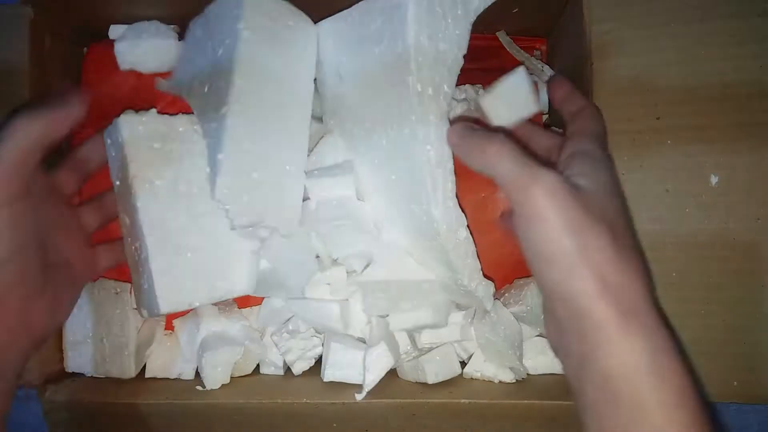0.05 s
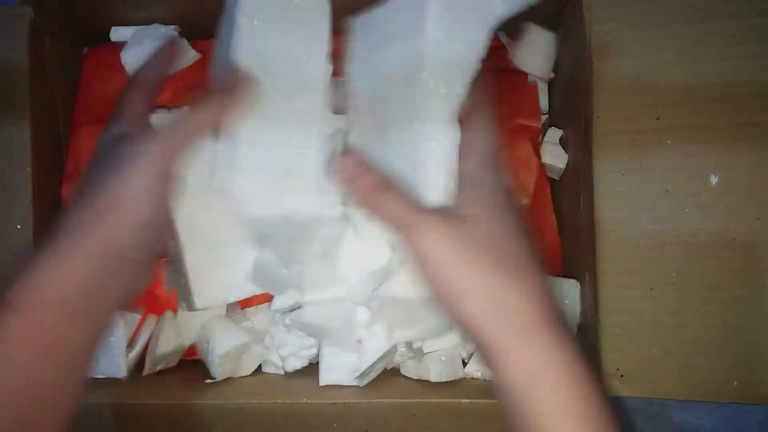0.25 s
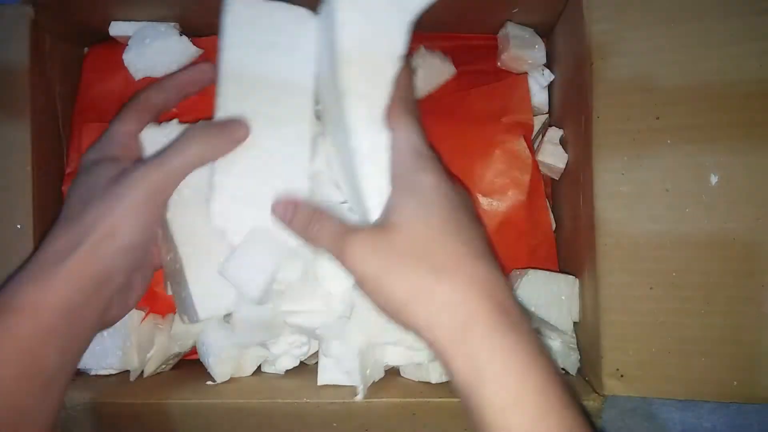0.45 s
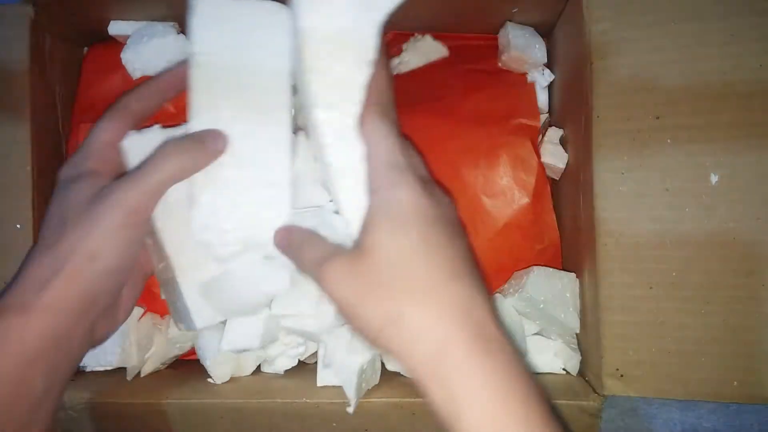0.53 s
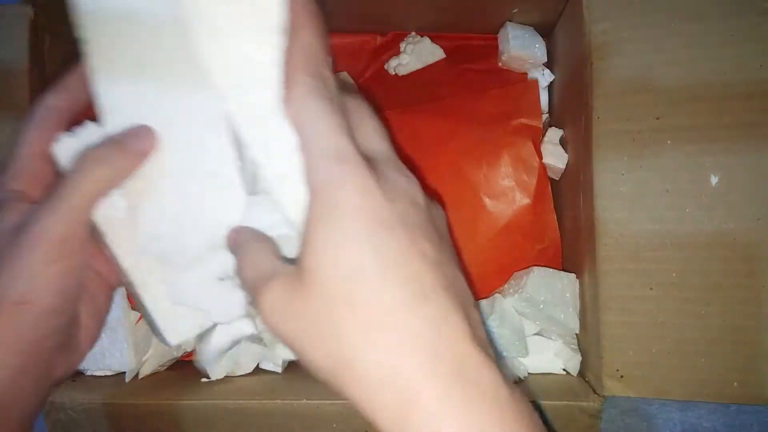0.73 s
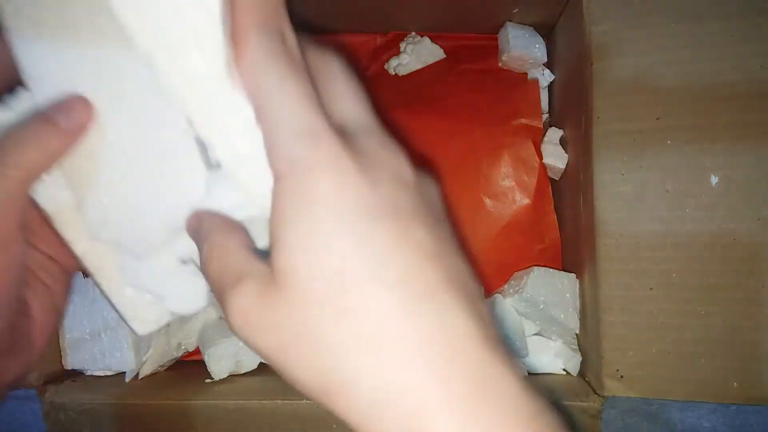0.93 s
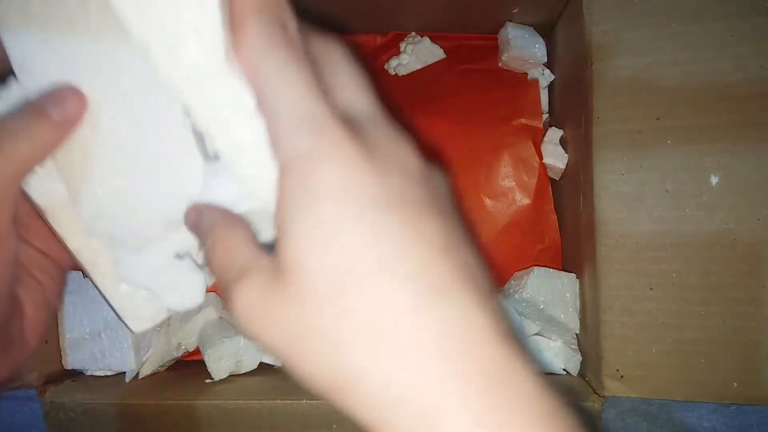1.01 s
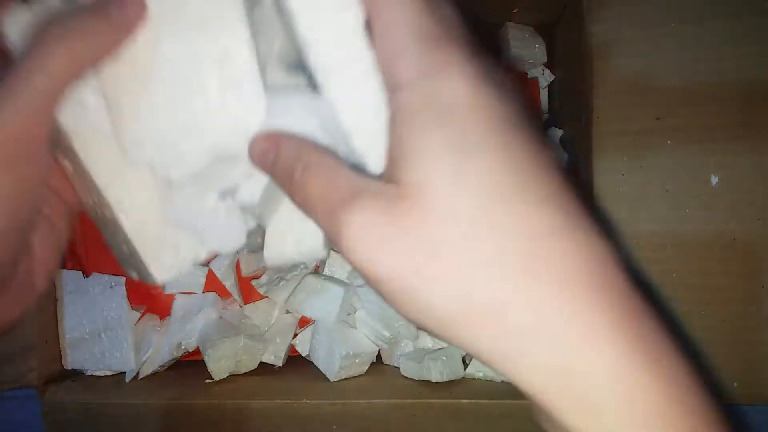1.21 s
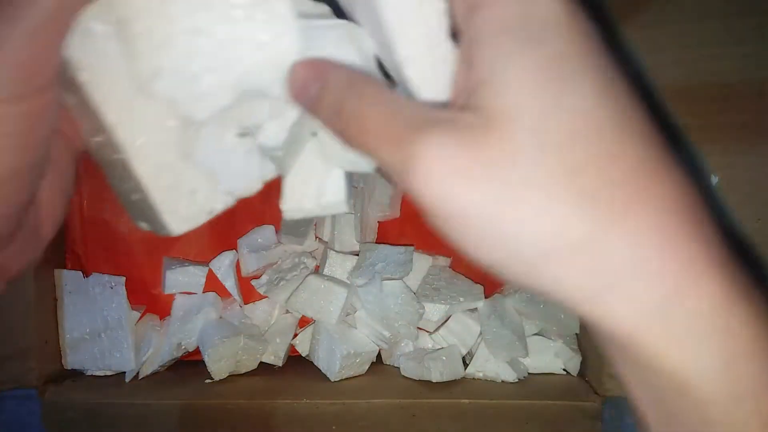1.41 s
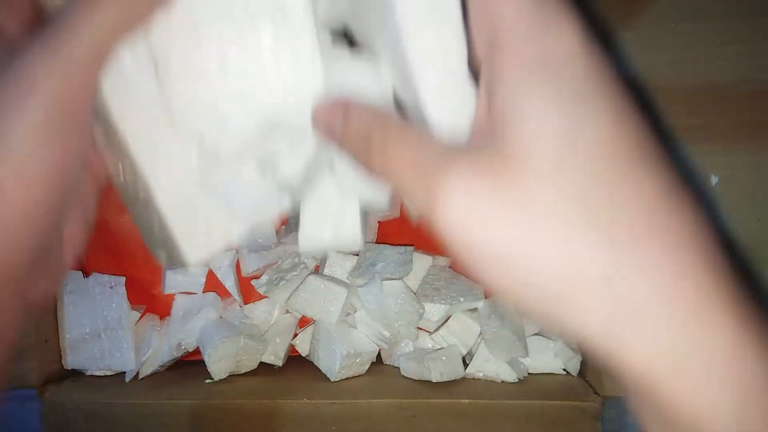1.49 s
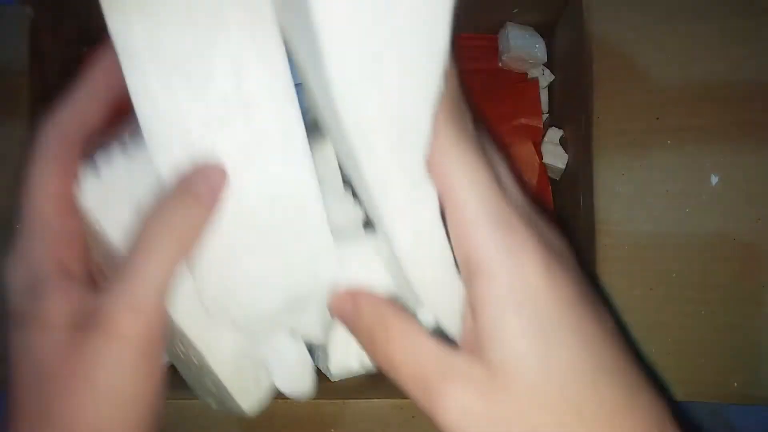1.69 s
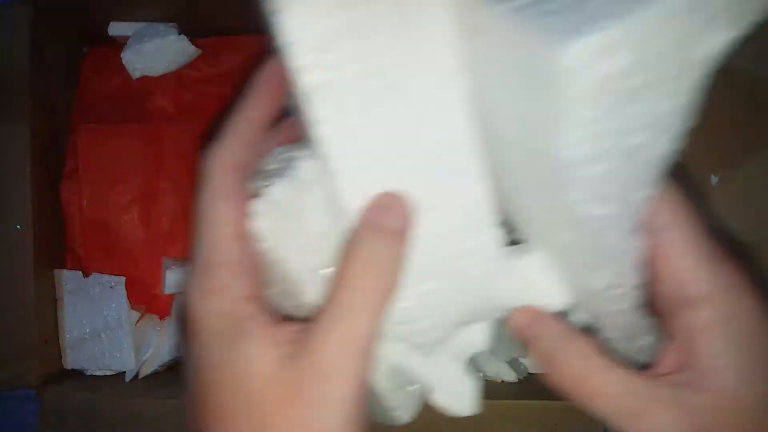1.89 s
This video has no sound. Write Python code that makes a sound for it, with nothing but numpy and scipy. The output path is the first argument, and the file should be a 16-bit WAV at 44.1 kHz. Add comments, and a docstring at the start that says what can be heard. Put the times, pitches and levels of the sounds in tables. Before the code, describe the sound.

Close stereo sound of foam packing handled in a cardboard box: light crackly rubbing and a dull thump, a loud bright squeaking scrape, then near quiet with crisp little snaps, and one final short knock and scuff indoors.

```python
"""Foam packing blocks are lifted by hand out of a cardboard box in a small room, close under a camera's
stereo microphone, above a quiet room hum. Filtered noise and sines make the hum and the box's rumble.
First a light rub, a hollow knock at 0.2 s and the sagging tone of the box wall; from 0.45 to 0.7 s a hard
rub that squeaks. Rubbing is thousands of damped sines, one for each bead slip, over finer hiss.
Then loose pieces tick and knock, each a few ringing modes, and a last short rub comes near 1.8 s."""
import sys
import numpy as np
from scipy import signal
from scipy.fft import rfft, irfft, next_fast_len
from scipy.io import wavfile
from scipy.ndimage import uniform_filter1d, map_coordinates

SR = 44100
rng = np.random.default_rng(int(sys.argv[2]) if len(sys.argv) > 2 else 0)


def to_wav(s):
    """Save 16-bit WAV."""
    ch = np.atleast_2d(s).T  # columns
    pcm = np.round(np.clip(ch, -1, 1) * 32767)  # PCM
    wavfile.write(sys.argv[1], SR, pcm.astype(np.int16))


N = 85995  # samples


def amp(db):
    """dB to gain."""
    return 10 ** (np.asarray(db) / 20)


def unit(x):
    """Scaled to rms 1, over both channels together."""
    return x / np.sqrt(np.mean(x ** 2) + 1e-20)


def along(points, hz):
    """Value at hz between (frequency [Hz], value) points on a log axis."""
    f, v = np.transpose(points)
    return np.interp(np.log(hz + 1), np.log(f + 1), v)


def curves(rows):
    """One value per sample for each column after the time."""
    s, *columns = np.transpose(rows)
    return [np.interp(np.arange(N) / SR, s, column) for column in columns]


def filtered(x, response):
    """x times a response of frequency."""
    m = next_fast_len(N + 8192)
    return irfft(rfft(x, m) * response(np.fft.rfftfreq(m, 1 / SR)), m)[..., :N]


def wobble(rate):
    """A smooth random curve, rate knots a second."""
    knots = rng.standard_normal(int(N * rate / SR) + 4)
    return map_coordinates(knots, [np.arange(N) * rate / SR])


def rings(s, hz, t60, db, size):
    """Sum of damped sines, each starting at its own time between samples and cut after size samples."""
    first = np.floor(s * SR).astype(int) + 1
    t = (first / SR - s)[:, None] + np.arange(size) / SR
    decay = amp(db[:, None] - 60 * t / t60[:, None])
    wave = decay * np.sin(2 * np.pi * hz[:, None] * t)
    at = np.clip(first[:, None] + np.arange(size), 0, N)  # what falls past the end lands in bin N
    return np.bincount(at.ravel(), wave.ravel(), N + 1)[:N]


# Spectrum of the room noise: (frequency [Hz], relative level [dB per Hz])
AIR_COLOUR = [(20, -34.5), (40, -10.5), (150, -13), (216, -29), (284, -18), (371, -19), (449, -9.5),
              (600, -29.5), (1040, -28.5), (1640, -29.5), (4200, -31), (15800, -32)]
# How alike left and right hear it: (frequency [Hz], correlation [1])
AIR_LIKENESS = [(100, 0.94), (500, 0.75), (2000, .5), (8000, .3)]
# Hum tones, before they waver: (frequency [Hz], level [dB rms])
HUM_TONES = [(64.6, -84), (91.5, -88), (274.5, -85)]
AIR_DB = -79.5  # rms of the noise


def air():
    """Room noise, more alike on both sides in the bass, with a few hum tones wavering in level and phase."""
    def turn(hz):
        return np.arccos(np.clip(along(AIR_LIKENESS, hz), -1, 1)) / 2

    def mid_side_response(hz):
        return amp(along(AIR_COLOUR, hz)) * [np.cos(turn(hz)), np.sin(turn(hz))]

    mid, side = filtered(rng.standard_normal((2, N)), mid_side_response)
    noise = unit(np.array([mid + side, mid - side]))
    t = np.arange(N) / SR
    hum = 0
    for hz, db in HUM_TONES:
        level = amp(db + 3 + wobble(4))  # a sine peaks 3 dB above its rms
        hum = hum + level * np.sin(2 * np.pi * hz * t + .4 * wobble(3))
    return amp(AIR_DB) * noise + hum


ROOM_T60_S = .08
ROOM_DB = -8  # tail against the direct foam, before the bass is thinned


def room(x):
    """Short answer of box and walls: decaying noise, different on each side, thin in the bass."""
    t = np.arange(SR // 4) / SR
    tail = rng.standard_normal((2, len(t))) * amp(-60 * t / ROOM_T60_S) * (t > .002)
    wet = signal.fftconvolve(x, tail / np.linalg.norm(tail[0]), axes=1)[:, :N]
    return amp(ROOM_DB) * filtered(wet, lambda f: f / np.hypot(f, 900))


# Rumble of the box, before a common 3.5 dB cut: (time [s], level [dB])
BOX_RUMBLE = [(0.0, -77), (0.172, -73.5), (0.19, -72), (0.2, -48), (0.216, -51), (0.244, -55.5),
              (0.336, -71.5), (0.672, -65), (0.71, -77), (1.758, -82), (1.824, -62.5), (1.862, -74),
              (1.95, -71)]


def rumble():
    """The cardboard box rumbles as the blocks drag on it: low noise, nearly alike on both sides."""
    # (frequency [Hz], relative level [dB])
    colour = [(25, -29.5), (55, -2), (100, -6.5), (200, -8.5), (320, -3.0), (450, -9.0), (2000, -77)]
    a, b = filtered(rng.standard_normal((2, N)), lambda f: amp(along(colour, f)))
    level, = curves(BOX_RUMBLE)
    return amp(level - 3.5) * unit(np.array([a + 0.088 * b, a - 0.19 * b]))


# Box wall sounding under the drag: (time [s], pitch [Hz], level [dB])
BOX_WALL = [(.23, 770, -66), (.285, 697, -58), (.315, 678, -64), (.37, 653, -65), (.43, 617, -67)]
WALL_WIDTH_HZ = 130


def hollow():
    """A narrow, sagging resonance of the box wall: slow noise carried on the moving pitch."""
    hz, db = curves(BOX_WALL)
    t, phase = np.arange(N) / SR, 2 * np.pi * np.cumsum(hz) / SR
    a, b = filtered(rng.standard_normal((2, N)), lambda f: 1 / np.hypot(1, (2 * f / WALL_WIDTH_HZ) ** 2))
    sounding = (t > BOX_WALL[0][0]) * (t < BOX_WALL[-1][0])
    return amp(db) * sounding * unit(a * np.cos(phase) + b * np.sin(phase))


# Hollow knocks, level before modes and attack:
# (time [s], level [dB], pitch [Hz], decay by 60 dB [s], left over right [dB])
BLOCK_KNOCKS = [(0.2, -39.5, 210.3, 0.081, -1), (.553, -47.5, 440, 0.042, -4), (1.132, -46, 728, 0.018, 0),
                (1.168, -47.5, 676, 0.013, 5), (1.221, -49.5, 3160, 0.013, -5),
                (1.462, -41, 1122, 0.013, 5.5), (1.495, -53.5, 1150, 0.019, 6),
                (1.515, -54.5, 1100, 0.014, 4.5), (1.634, -57, 1035, 0.033, 5),
                (1.813, -36, 445, 0.023, -1.5), (1.8139, -38.5, 1270, 0.025, 12)]
# Modes of a knock: (multiple of the pitch [1], level [dB])
BLOCK_MODES = [(1, 3.5), (1.3, -7.5), (1.65, -5.5), (2, -16.5), (3.1, -9.5)]
KNOCK_ATTACK_S = 0.0029


def knocks():
    """Soft bumps that ring the low modes of a block or the box, higher modes dying sooner."""
    out, t = np.zeros((2, N + SR)), np.arange(SR // 4) / SR
    attack = 1 - np.exp(-t / KNOCK_ATTACK_S)
    for s, db, hz, t60, pan in BLOCK_KNOCKS:
        ring = 0
        for k, level in BLOCK_MODES:
            ring = ring + amp(level - 60 * t * k ** .5 / t60) * np.sin(2 * np.pi * hz * k * t)
        start = round(s * SR)
        out[:, start:start + len(t)] += amp([[db + pan / 2], [db - pan / 2]]) * ring * attack
    return out[:, :N]


# Single crisp snaps, level before the spread of modes:
# (time [s], level [dB], centre pitch [Hz], left over right [dB])
CRISP_TICKS = [(0.8577, -39, 6700, 7.5), (1.011, -50.5, 7640, 4), (1.0845, -47.5, 7630, -3),
               (1.1334, -45, 6350, 0), (1.1678, -42.5, 3520, 11), (1.2024, -52, 7900, -1.0),
               (1.254, -47, 8550, 4), (1.375, -51, 10370, 1.5), (1.3803, -53, 10260, 5.5),
               (1.39, -43.5, 8000, 2), (1.4357, -56.5, 4000, 4), (1.448, -55, 4500, -5),
               (1.4617, -52.5, 6870, 11), (1.4965, -63, 3620, 4), (1.6022, -59, 6080, 3.5),
               (1.6309, -49.5, 7730, 0.5), (1.7378, -47.5, 8300, -7), (1.7575, -49, 6170, 13),
               (1.7732, -40.5, 8400, -12), (1.856, -55, 5000, 5), (1.9014, -51.5, 6180, -13),
               (1.931, -43, 7000, 0)]
TICK_MODES = np.linspace(-.6, .5, 14)  # natural-log steps from the centre pitch
TICK_T60_S = .007


def ticks():
    """Each crisp snap is a short burst of modes spread round its pitch, weaker away from it."""
    s, db, hz, pan = np.repeat(np.transpose(CRISP_TICKS), len(TICK_MODES), axis=1)
    step = np.tile(TICK_MODES, len(CRISP_TICKS))
    g = rng.standard_normal((len(s), 3))
    s = s + .001 * abs(g[:, 0])  # modes start up to a few ms apart
    hz = np.clip(hz * np.exp(step + .03 * g[:, 1]), 900, 14500)
    db = db - 6 - 12 * abs(step) + 2 * g[:, 2]
    t60 = TICK_T60_S + 0 * s
    pair = np.array([rings(s, hz, t60, db + side * pan / 2, size=500) for side in (1, -1)])
    return filtered(pair, lambda f: f ** 2 / (f ** 2 + 1500 ** 2))


# Colour of the blocks, for crackle and squeak: (frequency [Hz], level [dB])
FOAM_COLOUR = [(400, -22.5), (680, -16.5), (1100, -16.5), (1300, -8.5), (2200, -15), (2500, -19),
               (3160, -14.5), (3700, -13), (4200, -11.5), (5000, -6), (5400, -6.5), (6120, -4), (6800, -1),
               (7300, -2.5), (8100, -4.5), (8830, -4), (10900, -11), (12000, -14.5), (15800, -21.5)]
# Squeak of the pressed blocks, level before colour and scatter: (time [s], pitch [Hz], level [dB])
FOAM_SQUEAK = [(.45, 5000, -60), (0.469, 5000, -23.5), (.495, 5100, -39), (.51, 6120, -28.5),
               (.6, 6050, -30.5), (.62, 5900, -47), (0.673, 5250, -22.5), (.69, 5200, -56.5)]
SQUEAK_T60_S = .012
UNDER_HZ, UNDER_DB = 3230, 0.5  # lower mode that does not glide; its level over the upper one


def squeak(slips):
    """Every slip of the face rings two modes while the hands press hardest."""
    at, hz, db = np.transpose(FOAM_SQUEAK)
    s, slip_db = slips
    g = rng.standard_normal((3, len(s)))
    level = np.interp(s, at, db, -150, -150) + slip_db + 3 * g[0]
    t60 = SQUEAK_T60_S + 0 * s
    upper = rings(s, np.interp(s, at, hz) * np.exp(0.0095 * g[1]), t60, level, size=700)
    under = rings(s, UNDER_HZ * np.exp(0.084 * g[2]), t60, level + UNDER_DB, size=700)
    return filtered(upper + under, lambda f: amp(along(FOAM_COLOUR, f)) * f ** 6 / (f ** 6 + 2500. ** 6))


SHIFTING_DB = 2.4  # rms of the gain patches


def shifting(pair):
    """The blocks' resonances wander as they move: gain patches some hundred Hz wide, tens of ms long."""
    z = signal.stft(pair, nperseg=512)[2]
    field = uniform_filter1d(rng.standard_normal(z.shape[1:]), size=3, axis=0)  # over frequency
    field = uniform_filter1d(field, size=10, axis=1)  # over time
    return signal.istft(z * amp(SHIFTING_DB * unit(field)), nperseg=512)[1][:, :N]


LAG_S, LAG_SCATTER_S, PAN_SCATTER_DB = .00004, .00003, 9.5  # left behind right, per snap
SPREAD_DB, CLUMP_DB = 2, 1.5  # loudness: mean of the exponential spread; size of the shared wobble
CYCLES_AT_2KHZ = 4.9  # cycles to decay by 60 dB; more at higher pitch
SLIP_SHARE, SLIP_BLUR_S = .3, .0002  # share of snaps moved to a slip; their scatter after it
HISS_DB = -3  # slips too fine to tell apart, against the snaps


def snaps(lo_hz, hi_hz, rate, pan_db, jerk, slips):
    """Stereo crackle of bead slips in one band, each slightly displaced, on hiss; a share slip together."""
    count = int(rate * N / SR)
    u, g = rng.random((count, 4)), rng.standard_normal((count, 3))
    s, hz = u[:, 0] * N / SR, lo_hz + (hi_hz - lo_hz) * u[:, 1]
    db = -SPREAD_DB * np.log(u[:, 2]) + CLUMP_DB * jerk[(s * SR).astype(int)]
    # some snaps let go when the whole face slips
    slip_s, slip_db = slips
    last, joined = np.searchsorted(slip_s, s) - 1, u[:, 3] < SLIP_SHARE
    s = np.where(joined, slip_s[last] + SLIP_BLUR_S * abs(g[:, 2]), s)
    db = db + joined * slip_db[last]
    lag, pan = LAG_S + LAG_SCATTER_S * g[:, 0], PAN_SCATTER_DB * g[:, 1]
    t60 = CYCLES_AT_2KHZ / np.sqrt(hz * 2000)
    crackle = np.array([rings(s + side * lag / 2, hz, t60, db + side * pan / 2, size=200)
                        for side in (1, -1)])
    a, b = filtered(rng.standard_normal((2, N)), lambda f: (f > lo_hz) * (f < hi_hz))
    hiss = np.array([a + 0.83 * b, a - 0.67 * b])
    pair = unit(crackle) + amp(HISS_DB) * unit(hiss)

    def coloured_band(f):
        edges = 1 / np.sqrt((1 + (lo_hz / (f + 1)) ** 16) * (1 + (f / hi_hz) ** 16))
        return edges * amp(along(FOAM_COLOUR, f))

    return unit(filtered(shifting(pair), coloured_band)) * amp([pan_db / 2, -pan_db / 2])


# Edges of the five crackle bands: (frequency [Hz])
BAND_EDGES = [350, 1150, 2400, 4200, 6800, 15500]
# Bead slips in each band, low to high: (rate [1/s])
SNAP_RATES = [2000, 2500, 3000, 3000, 4500]
# Rubbing, stretch by stretch: (time [s], treble level [dB], upper middle over treble [dB],
# low middle over treble [dB], bass over treble [dB])
RUB_STRETCHES = [
    [(0.0, -40, -4.5, -16, -29.5), (0.024, -53.5, -7.5, -9, -28), (0.064, -44.5, -6.5, -11, -27),
     (0.08, -56.5, -4, -11, -13), (0.108, -54.5, -9.5, -1, -17), (0.154, -42, -5, -19, -27),
     (0.186, -44, -4.5, -12, -28), (0.202, -34.5, -5.5, -13, -29), (0.234, -36, -4.5, -9.5, -26),
     (0.246, -41.5, -8, -8.5, -22), (0.282, -40.5, -11, -9, -14.5), (0.33, -40.5, -6, -15.5, -25.5),
     (0.384, -36.5, -8, -11.5, -25.5)],
    [(0.44, -33.5, -7.5, -18, -33.5), (0.466, -24.5, -13, -21.5, -41), (0.492, -26, -9, -24.5, -36.5),
     (0.58, -23, -12.5, -23.5, -35.5), (0.592, -21.5, -7.5, -28.5, -42), (0.624, -36, -9.5, -13.5, -27),
     (0.642, -23.5, -9.5, -26, -39), (0.67, -23, -14, -32, -51), (0.692, -41.5, -5, -14.5, -34.5),
     (0.776, -56.5, -9.5, -22.5, -27)],
    [(0.81, -57, -11.5, -18, -24.5), (0.906, -58, -18, -24, -24), (1.0, -64.5, -17, -27, -24),
     (1.018, -55, -27, -14, -23.5), (1.042, -63, -18, -17, -33), (1.068, -72.5, -14, -18, -14),
     (1.084, -64, -37, -24, -18), (1.12, -62.5, -18, -35, -28)],
    [(1.135, -67, -6, -25, -6), (1.1395, -39, -9, -25, -31.5), (1.147, -39.5, -3.5, -30, -39),
     (1.153, -58, -4, -39, -18), (1.163, -55.5, -7, -16, -15), (1.205, -61, -8, -14, -25),
     (1.227, -70.5, -3, -14, -12), (1.245, -70.5, -12, -17, -26), (1.255, -63, -26, -22, -40),
     (1.267, -68.5, -22, -18, -19), (1.289, -73.5, -3.5, -11.5, -16), (1.35, -79, -26, -19.5, -13.5)],
    [(1.36, -73, -10, -10, -16), (1.38, -54, -23, -26, -25), (1.402, -59.5, -17, -21, -25),
     (1.44, -69.5, -7, -7, -9), (1.466, -65, -3, -1.5, -13.5), (1.48, -77, -6, 2, -9),
     (1.494, -68.5, -6, -11.5, -10), (1.582, -83.5, -14, -10, -26), (1.64, -58.5, -11, -15.5, -13.5),
     (1.674, -64, -17, -15, -18),],
    [(1.73, -76, -17.5, -12, -20), (1.768, -70, -8, 1, -9), (1.772, -46.5, -15, -11.5, -21),
     (1.796, -46.5, -9, -17, -20.5), (1.814, -36, -9.5, -11, -9), (1.848, -62.5, -2.5, -5, -8.5),
     (1.856, -51, -15, -15, -14.5), (1.892, -69, -9, -4, -8), (1.906, -55, -16, -28, -23),
     (1.924, -60, -8, -25, -17), (1.932, -58, -13, -25, -36), (1.95, -78, -6, -3, -3)],
]
# Left over right: (time [s], high treble [dB], low treble [dB], middle [dB])
RUB_PLACE = [(0.0, 2, -14.5, -2), (0.118, 5, -1, 0.0), (0.222, 1.5, -9.5, -3.5), (0.254, 2.5, -3.5, -2.5),
             (0.608, 7, -2, -1.5), (0.754, 1, -2.5, -1.5), (1.416, 2, -4, -2), (1.45, -2, -1, 6),
             (1.542, 1.5, -2, -4), (1.852, 1, -4, -1.5), (1.95, -1, -15, -5)]
# High treble over low treble, beyond its usual share: (time [s], level [dB])
RUB_BRIGHT = [(0, -1), (.6, -1.5), (1.12, 3.5), (1.14, -3.5), (1.2, -0.5), (1.38, 7.5), (1.47, -3),
              (1.65, 3), (1.8, 2)]
HIGH_DB, MID_HIGH_DB = -2, -5  # usual shares of the treble above and below the split
SLIPS_PER_S, SLIP_UNEVEN, SLIP_SPREAD_DB = 290, .3, 1.5  # uneven: log-spread of the gaps


def rubbing():
    """Foam on foam: crackle in five bands follows the hands' pressure, sticking and slipping together."""
    treble, upper, low, bass = curves(sum(RUB_STRETCHES, []))
    high_pan, low_treble_pan, middle_pan = curves(RUB_PLACE)
    bright, = curves(RUB_BRIGHT)
    levels = [treble + bass, treble + low, treble + upper,
              treble + MID_HIGH_DB - bright / 2, treble + HIGH_DB + bright / 2]
    pans = [0 * high_pan, middle_pan, middle_pan, low_treble_pan, high_pan]
    jerk = wobble(220)  # loudness wobble shared by all bands
    g = rng.standard_normal((2, 4 * SLIPS_PER_S))
    gaps = np.exp(SLIP_UNEVEN * (g[0] - SLIP_UNEVEN / 2)) / SLIPS_PER_S
    slips = np.cumsum(gaps), SLIP_SPREAD_DB * g[1]  # times [s], levels [dB]
    out = amp([low_treble_pan / 2, -low_treble_pan / 2]) * squeak(slips)
    for lo_hz, hi_hz, db, pan, rate in zip(BAND_EDGES, BAND_EDGES[1:], levels, pans, SNAP_RATES):
        out = out + amp(db) * snaps(lo_hz, hi_hz, rate, pan, jerk, slips)
    return out


def scene():
    """The air, the box, and the foam with its room."""
    foam = knocks() + ticks() + rubbing()
    return air() + rumble() + hollow() + room(foam) + foam


def record(dry):
    """The camera keeps nothing above its band limit of 15.8 kHz."""
    return filtered(dry, lambda hz: hz < 15800)


dry = scene()
out = record(dry)
to_wav(out)
```